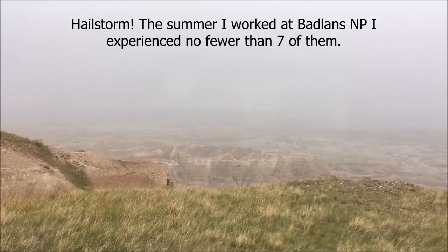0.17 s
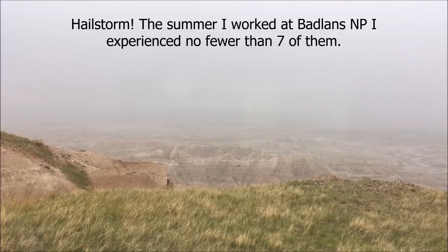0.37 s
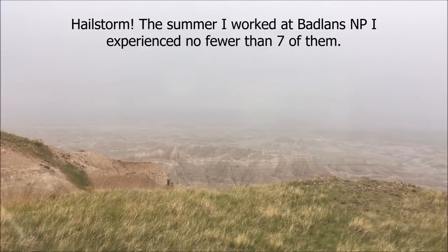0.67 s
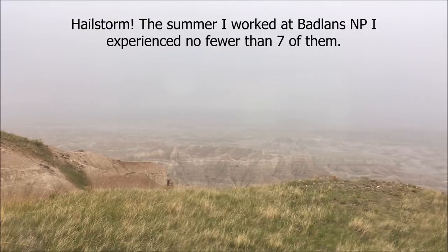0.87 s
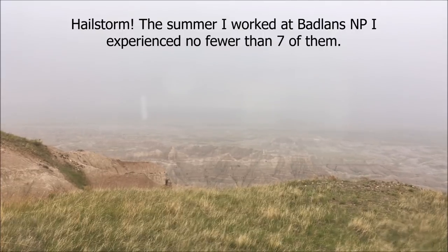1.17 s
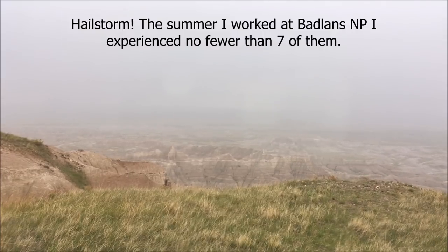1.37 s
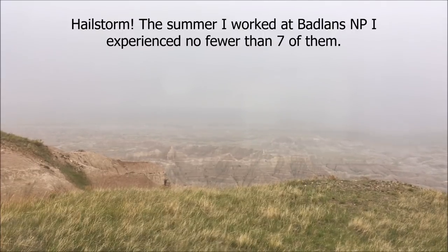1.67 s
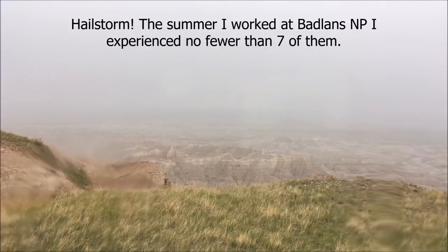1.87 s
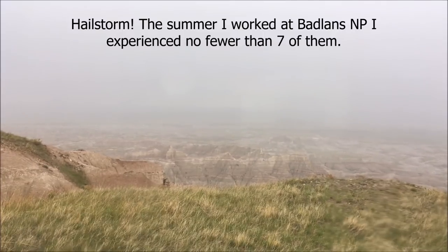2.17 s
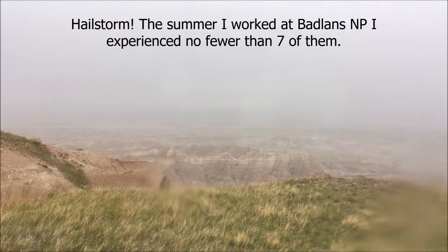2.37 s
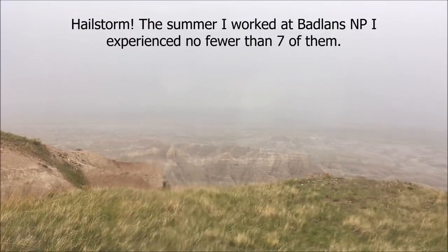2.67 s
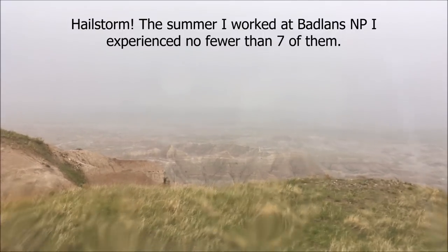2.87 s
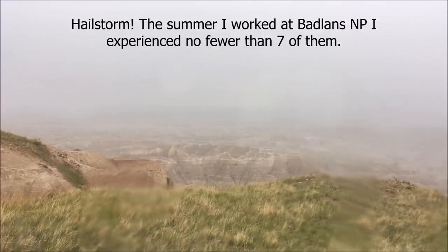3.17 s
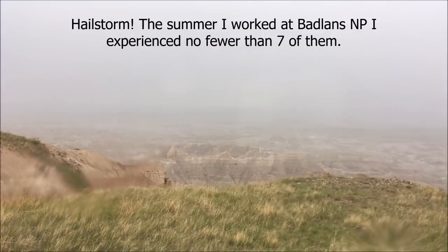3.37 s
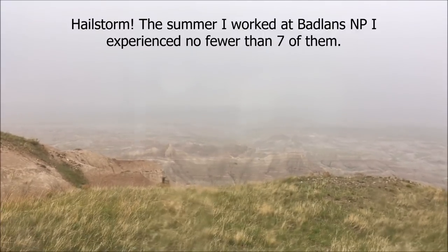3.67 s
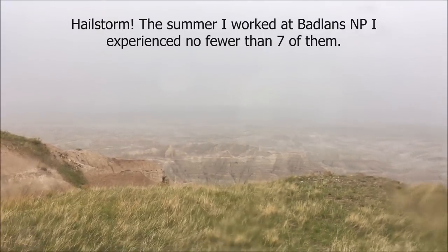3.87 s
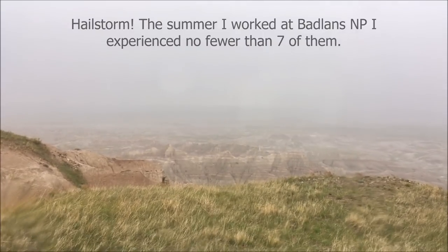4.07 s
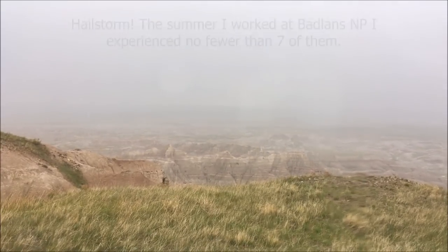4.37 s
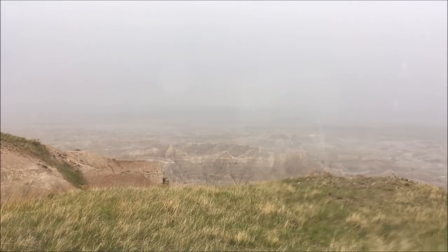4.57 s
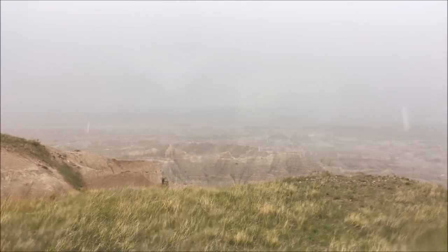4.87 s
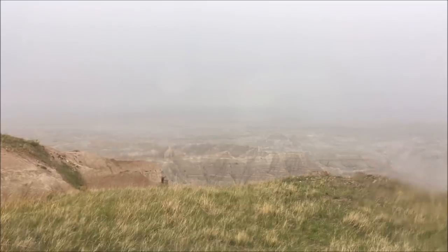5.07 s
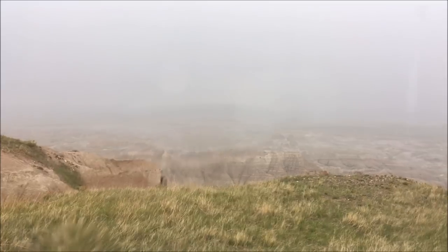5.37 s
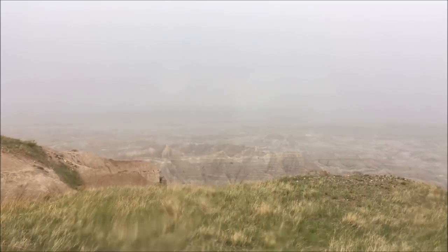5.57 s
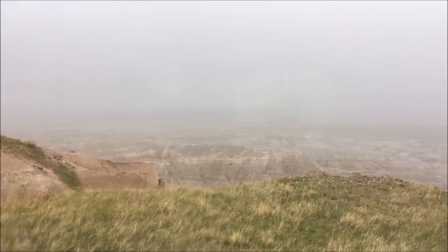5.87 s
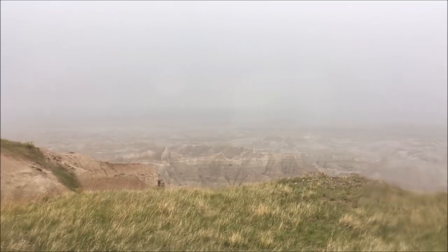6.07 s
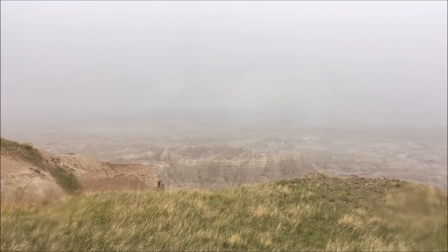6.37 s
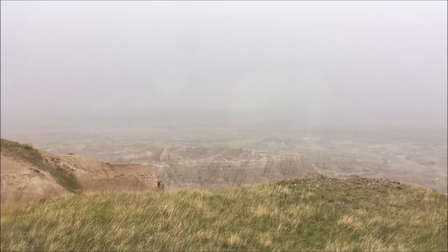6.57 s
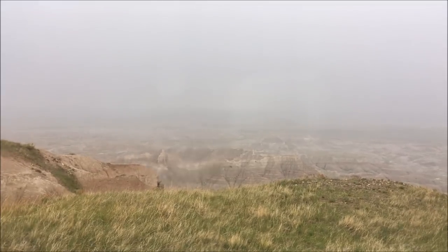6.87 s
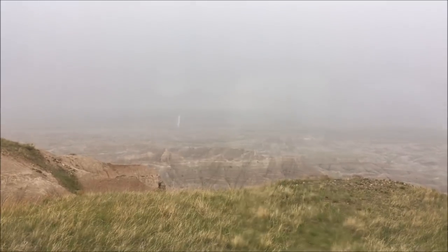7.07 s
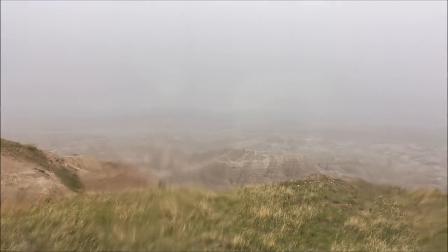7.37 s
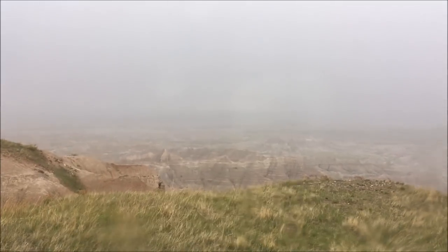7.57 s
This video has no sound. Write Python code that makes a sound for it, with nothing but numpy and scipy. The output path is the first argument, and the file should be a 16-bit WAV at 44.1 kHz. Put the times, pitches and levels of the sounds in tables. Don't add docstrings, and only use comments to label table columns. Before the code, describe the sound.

Heard from inside a parked car, hailstones crack and tick on windows and roof above a steady rushing patter that finally fades away.

```python
import sys
import numpy as np
from scipy import signal
from scipy.fft import rfft, irfft, next_fast_len
from scipy.io import wavfile
from scipy.ndimage import uniform_filter1d

SR = 44100
rng = np.random.default_rng(int(sys.argv[2]) if len(sys.argv) > 2 else 0)


def natural_amplitude(level_db):
    exponent = np.asarray(level_db, float) / 20
    return 10 ** exponent


def to_wav(sig):
    pcm = np.clip(np.atleast_2d(sig), -1, 1) * 32767
    pcm = np.round(pcm).astype(np.int16)
    wavfile.write(sys.argv[1], SR, pcm.T)


N = 340008


def curve(table, hz):
    f, db = np.transpose(table)
    return natural_amplitude(np.interp(np.log(hz + 1), np.log(f), db))


def mode(hz, centre_hz, width_hz):
    return 1j * hz * width_hz / (centre_hz ** 2 - hz ** 2 + 1j * hz * width_hz)


def mode_sum(hz, table):
    return sum(natural_amplitude(db) * mode(hz, f, width) for f, width, db in table)


def steep(hz, low_hz, high_hz):
    edges = signal.butter(3, [low_hz, high_hz], "band", fs=SR, output="sos")
    return signal.sosfreqz(edges, hz, fs=SR)[1]


def unit(x):
    return x / np.sqrt(np.mean(x ** 2))


def shaped(x, gain):
    size = next_fast_len(N)
    hz = np.arange(size // 2 + 1) * SR / size
    return irfft(rfft(x, size) * gain(hz), size)[:N]


def walk(rate):
    k = int(SR / rate)
    held = np.repeat(rng.standard_normal(N // k + 1), k)
    return 1.69 * uniform_filter1d(uniform_filter1d(held, k), k)[:N]


def add(out, s, sound):
    i = max(int(s * SR), 0)
    out[i:i + len(sound)] += sound[:N - i]


def bursts(rate, spread_db, decay_s):
    chance = rng.random((2, N))
    size = (chance[0] < rate / SR) * natural_amplitude(spread_db * chance[1])
    return unit(signal.lfilter([1], [1, -np.exp(-1 / (decay_s * SR))], size))


def patter(db):
    # pitch_hz, level_db (per Hz)
    patter_colour = [(500, -25), (800, -7.5), (1700, -9), (2350, -7.5), (2800, -2), (3280, 2), (3650, -8),
                     (4000, -14), (4400, -17), (5000, -23.5), (5600, -19.5), (7200, -34), (10400, -50),
                     (16000, -46)]
    grain = bursts(rate=300, spread_db=17, decay_s=0.003) + natural_amplitude(-1)
    noise = grain * rng.standard_normal(N) * natural_amplitude(0.9 * walk(12))
    return unit(shaped(noise, lambda hz: curve(patter_colour, hz))) * natural_amplitude(db + 1.5)


def hiss(db):
    # pitch_hz, level_db (per Hz)
    hiss_colour = [(3500, -30), (4700, -9), (5900, -6), (7300, -13), (8600, -13), (10400, -19),
                   (11500, -16), (13000, -17), (16000, -20)]
    grain = 1 + natural_amplitude(-7) * bursts(rate=110, spread_db=16, decay_s=.0012)
    veil = unit(shaped(grain * rng.standard_normal(N), lambda hz: curve(hiss_colour, hz)))
    return veil * natural_amplitude(db - 24.0 + 1.1 * walk(23))


def cabin(db):
    # pitch_hz, level_db (per Hz)
    hum_colour = [(15, -82), (25, -16), (70, -0.5), (167, -1), (290, -3), (362, -2), (460, -9), (605, -6),
                  (1060, -15.5), (1260, -15), (1500, -19), (1950, -34), (3300, -120)]
    # pitch_hz, width_hz, level_db
    air_modes = [(85.5, 16, -7.5), (184, 51, -8), (525, 84, -12.5)]
    # pitch_hz, width_hz, level_db
    roof_modes = [(85.5, 7.1, 9), (174.7, 12.3, 6), (325, 43, -17), (583, 100, -8)]
    # start_s, peak_db
    thumps = [
        (0.136, -37.5),
        (0.279, -29.5),
        (0.634, -58),
        (1.209, -43),
        (2.081, -39),
        (3.867, -40.5),
        (4.038, -40),
        (4.327, -40.5),
        (6.462, -49),
    ]
    lumps = natural_amplitude(1.3 * walk(30)) * rng.standard_normal(N)
    hum = shaped(lumps, lambda hz: curve(hum_colour, hz) * (1 + 0.78 * np.abs(mode_sum(hz, air_modes))))
    hum = unit(hum) * natural_amplitude(db + 0.14)
    push = np.arange(N) < .0008 * SR
    thump = shaped(push, lambda hz: mode_sum(hz, roof_modes))[:SR // 4]
    for s, peak_db in thumps:
        add(hum, s, natural_amplitude(peak_db) * thump / np.abs(thump).max())
    return hum


def pellets(patter_db):
    per_s, over_patter_db, scatter_db = 40, 7.5, 3
    luck = rng.random(int(per_s * N / SR))
    when = (np.arange(len(luck)) + luck) / per_s
    size_db = patter_db[(when * SR).astype(int)] + over_patter_db
    return when, size_db + scatter_db * rng.standard_normal(len(luck))


def fall(patter_db):
    # start_s, peak_db
    roof_taps = [(0.079, -35.5), (0.2714, -34.5), (0.3195, -34.5), (0.877, -32), (1.0837, -37),
                 (1.4319, -33.9), (1.447, -42), (1.5141, -29.5), (1.6833, -36), (2.2964, -36), (2.565, -35),
                 (2.6508, -36), (2.804, -31), (2.9123, -37), (3.0335, -36), (3.7542, -33.9), (4.021, -32),
                 (4.189, -38), (4.4276, -35.5), (4.4994, -36), (4.6742, -35), (5.1283, -36), (5.2968, -38),
                 (5.5186, -36.6), (6.021, -43), (6.197, -41.5), (6.2238, -42), (6.235, -44),
                 (6.7082, -41.5), (7.241, -46)]
    # start_s, peak_db, edge_db
    glass_ticks = [(0.1625, -36, -20), (0.2601, -35.4, -21), (0.632, -35, -14), (0.7372, -31, -18),
                   (0.8906, -33.5, -19), (1.0029, -45, 2), (1.0345, -48, -17), (1.189, -37.5, -13),
                   (1.202, -37, -18), (1.4046, -34, -20), (1.425, -37, -11), (1.6417, -49, -3),
                   (2.11, -34.5, -18), (2.2146, -44.5, -1), (2.4909, -33.6, -14), (2.6057, -32.5, -17),
                   (2.9292, -39, -9), (3.5647, -34.5, -11.7), (4.0736, -40.5, -3.5), (4.207, -37.5, -15),
                   (4.244, -36.2, -24), (4.2976, -45, 1.5), (4.3789, -46, -6), (5.2156, -37, -7.7),
                   (5.5392, -45.5, -2), (5.5622, -44, -13.7), (5.703, -40, -12), (6.3203, -45, -12),
                   (6.3348, -48, -11.8), (6.5253, -52, -4)]
    # start_s, peak_db
    small_stones = [(0.199, -30.5), (0.5579, -31), (0.9816, -34), (1.465, -37), (1.6766, -29),
                    (2.268, -33.5), (2.949, -33.5), (3.0615, -30.5), (3.3153, -33.5), (3.531, -38),
                    (3.7778, -29.5), (3.819, -27.5), (3.8983, -36), (4.2867, -34), (4.4766, -33),
                    (4.5554, -33), (5.2381, -33), (5.5693, -37.5), (5.9036, -41), (5.9274, -40.5),
                    (6.1148, -38), (6.1193, -43), (6.843, -51), (7.1565, -43.5), (7.1755, -46),
                    (7.3092, -50), (7.3155, -46), (7.3606, -49), (7.6243, -47), (7.6874, -49.6)]
    # start_s, peak_db, body_db, edge_db
    large_stones = [(0.3951, -22, -11, -6.5), (0.407, -23, -9, -4.5), (0.7101, -19.5, -12.5, -5.2),
                    (0.7205, -23, -28, -21), (0.9918, -29, -25, -12), (1.0572, -29, -7, -3),
                    (1.5946, -23, -24, -9.6), (1.8699, -27.5, -14.5, -10.5), (2.0874, -28, -5.5, -3.5),
                    (2.436, -22, -10, -2.5), (2.9025, -26, -14.3, -8), (3.0914, -24.5, -16, -9),
                    (3.138, -22, -13, -11), (3.7426, -16, -17, -18), (3.8698, -28.9, -4, -4.5),
                    (4.048, -29.5, -5.5, -4.5), (4.1399, -25.5, -10.5, -11), (4.6859, -28.5, -6, -6.5),
                    (4.8913, -28.5, -16, -6.5), (4.9126, -25, -15, -12), (4.9163, -33.5, -1.5, 2),
                    (4.9956, -26, -12, -10.5), (5.7496, -34.1, -9.7, -5.5), (5.7707, -30.5, -21, -10.5),
                    (6.071, -28, -16.5, -10), (6.471, -32.0, -11.5, -12), (6.6307, -35.3, -6.5, -4),
                    (6.8477, -36, -10, -12.5), (6.9585, -36, -14, -7.5), (6.9914, -29, -12.6, -9.5)]
    # start_s, peak_db, body_db
    roof_stones = [(0.702, -28, -16), (0.7264, -31, -11), (0.835, -30, -13.5), (0.9471, -25, -15),
                   (1.1459, -26, -12), (1.4695, -26, -31), (2.1653, -32.5, -17), (2.6225, -27, -22),
                   (3.1474, -26.5, -13), (3.2229, -27, -24), (3.2347, -28.5, -20), (3.3596, -32.0, -30),
                   (3.4212, -25.8, -14), (3.964, -28.5, -23), (4.3515, -33, -16), (4.3659, -29.5, -9),
                   (4.5305, -25, -16), (4.7545, -32.5, -7), (4.7647, -28.5, -12), (4.946, -27.5, -14.8),
                   (5.556, -36.5, -4.5), (6.133, -29.5, -10), (6.159, -38, -8), (6.2596, -40.5, -24),
                   (6.2893, -39, -27), (6.4316, -37, -25), (6.7508, -43, -31), (6.8629, -38.4, -11.3),
                   (6.885, -44.5, -17), (7.6522, -43.5, -18.2)]
    # start_s, peak_db, edge_db
    glass_stones = [(0.841, -31, -4), (0.9527, -32, -6), (1.382, -37, 0), (1.3944, -34, -9),
                    (1.6552, -28.5, -9.5), (2.4123, -25, -13.5), (2.486, -31.5, -11),
                    (3.0268, -32.5, -11.5), (3.2686, -31.7, -9), (3.321, -37, -6.5), (3.7172, -28, -7.5),
                    (3.8059, -25, -12), (3.8765, -33.9, -2.5), (4.1505, -39, -2), (4.2572, -30, -11),
                    (4.3725, -33.3, -9), (4.403, -31.5, -5.5), (4.9855, -29.5, -12), (5.0201, -36.0, -5.5),
                    (5.1676, -32.5, -16), (5.3037, -33, -9.5), (5.3265, -31, -14.5), (5.3942, -31.5, -13),
                    (6.1506, -37.7, -8.5), (6.451, -38, -9), (7.0509, -44.3, -15), (7.1043, -45, -11),
                    (7.1223, -38, -13.5), (7.1665, -39.5, -15), (7.6155, -53, -12)]
    small_body_db = -13
    rows = [(*row, 0, 0) for row in large_stones]
    rows += [(s, db, -11, edge, 1, 0) for s, db, edge in glass_stones]
    rows += [(s, db, body, -18.5, 0, 1) for s, db, body in roof_stones]
    rows += [(s, db, small_body_db, -17.5, 1, 1) for s, db in small_stones]
    rows += [(s, db, small_body_db, edge, 1, 0) for s, db, edge in glass_ticks]
    rows += [(s, db, small_body_db, -19, 1, 1) for s, db in roof_taps]
    rows += [(s, db, small_body_db, -15, 1, 1) for s, db in zip(*pellets(patter_db))]
    s, peak_db, body_db, edge_db, body_free, edge_free = np.transpose(rows)
    scatter_db = (rng.standard_normal((len(s), 3)) * [3.5, 3.5, 2]).T
    body_db = body_db + body_free * scatter_db[0]
    edge_db = edge_db + edge_free * scatter_db[1]
    splinter_db = edge_db - 11.5 + scatter_db[2]
    return s, peak_db, body_db, edge_db, splinter_db


def stones(patter_db):
    # pitch_hz, width_hz, level_db
    splinter_modes = [(8300, 2000, 0), (11500, 900, -10), (12900, 1400, -8), (15400, 1800, -15)]
    size = 2048
    s, peak_db, body_db, edge_db, splinter_db = np.array(fall(patter_db))[:, :, None]
    t, hz = np.arange(size) / SR, np.arange(size // 2 + 1) * SR / size
    chance = rng.standard_normal((len(s), size + 2))
    crack_s = 0.0027 * natural_amplitude(2.0 * chance[:, :1])
    rise = chance[:, 2:] * (1 - np.exp(-t / 0.000086))
    rise[:, 4:7] += 1.2 * np.sign(chance[:, 2:3])
    rattle = rise * (np.exp(-t / crack_s) + natural_amplitude(-35.0) * np.exp(-t / 0.0051))
    snap = rise * (np.exp(-t / (.6 * crack_s)) + natural_amplitude(-22) * np.exp(-t / .004))

    ring = mode(hz, 3200 * (1 + .04 * chance[:, 1:2]), 650) * steep(hz, 2200, 3850)
    body = (mode(hz, 2190, 480) + natural_amplitude(-9.5)) * steep(hz, 850, 1890)
    low_edge = mode(hz, 4330 * (1 + .05 * chance[:, :1]), 550)
    edge = (mode(hz, 5750, 850) + 1j * natural_amplitude(1) * low_edge) * steep(hz, 3700, 7200)
    splinter = (1j * mode_sum(hz, splinter_modes) + natural_amplitude(-19)) * steep(hz, 6600, 16500)

    parts = ((rattle, ring, 0), (snap, body, body_db - .1),
             (snap, edge, edge_db + 2.5), (snap, splinter, splinter_db + 3.5))
    sound = 0
    for burst, part, db in parts:
        y = irfft(rfft(burst) * part, size)
        sound = sound + natural_amplitude(peak_db + db) * y / np.abs(y).max(axis=1, keepdims=True)
    out = np.zeros(N)
    for when, y in zip(s[:, 0], sound):
        add(out, when - .0004, y)
    return out


def scene():
    # start_s, level_db (of the patter before the fade)
    squall = [(0, -52), (.29, -48), (.5, -53), (1.0, -51), (1.95, -54), (3.1, -53.5), (3.55, -55),
              (3.9, -52), (4.6, -54), (5.5, -54.5), (7.71, -56)]
    t = np.arange(N) / SR
    squall_db = np.interp(t, *np.transpose(squall))
    fade_db = -6 * np.maximum(t - 5.685, 0)
    patter_db = squall_db + fade_db
    boom_db = -51 - 0.2939 * t + .45 * (squall_db - squall_db.mean()) + 1.09 * fade_db
    return (patter(patter_db) + hiss(patter_db) + cabin(boom_db) + stones(patter_db))[None]


def dropouts(sound):
    # start_s, length_s
    gaps = [(.293, .02), (.334, .025), (1.103, .03), (1.337, .03), (2.34, .03), (3.708, .045),
            (4.028, .045), (4.857, .025), (4.929, .02), (5.817, .035), (5.987, .035), (6.541, .025),
            (6.713, .03), (7.651, .03)]
    t = np.arange(N) / SR
    keep = np.ones(N)
    for s, length in gaps:
        depth = min(length / .032, 1) ** .5
        keep *= 1 - depth * np.cos(np.pi * np.clip((t - s) / length, -.5, .5)) ** 2
    high = sound - signal.sosfiltfilt(signal.butter(10, 3800, fs=SR, output="sos"), sound)
    middle = signal.sosfiltfilt(signal.butter(4, [1450, 2150], "band", fs=SR, output="sos"), sound)
    return sound - (high + middle) * (1 - keep)


def low_pass(x):
    return signal.sosfilt(signal.butter(12, 16510, fs=SR, output="sos"), x)


def record(dry):
    top = signal.ellip(6, .5, 38, 15800, fs=SR, output="sos")
    mix = dropouts(signal.sosfilt(top, dry))
    return low_pass(mix)


dry = scene()
out = record(dry)
to_wav(out)
```